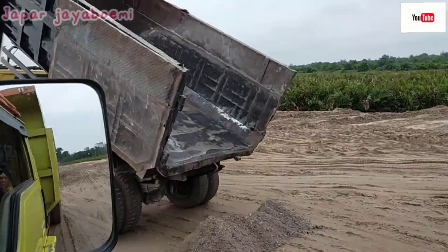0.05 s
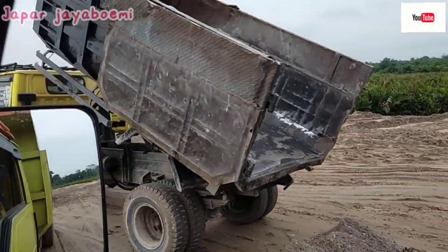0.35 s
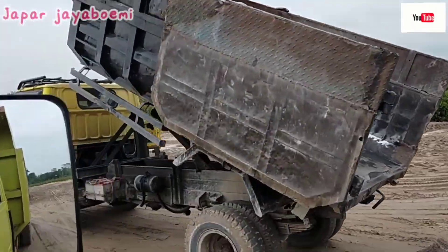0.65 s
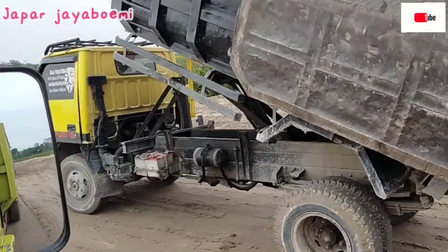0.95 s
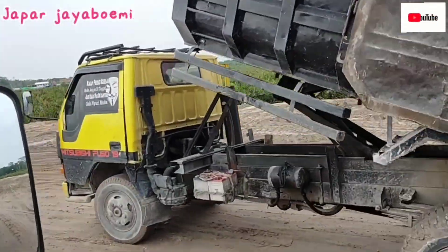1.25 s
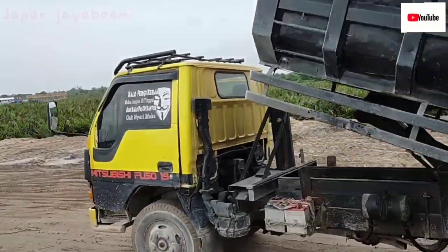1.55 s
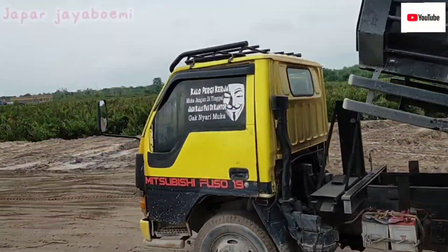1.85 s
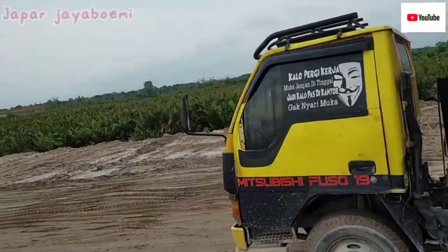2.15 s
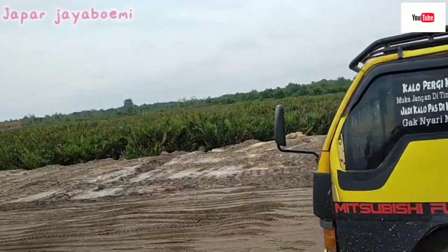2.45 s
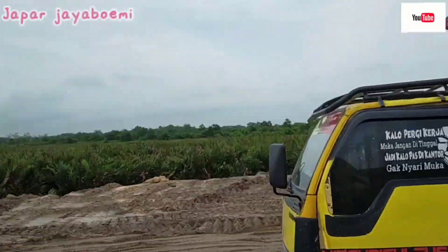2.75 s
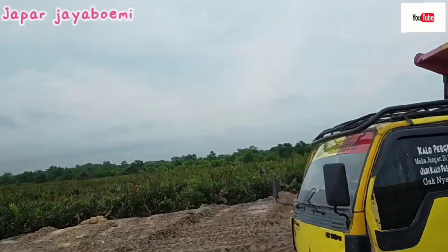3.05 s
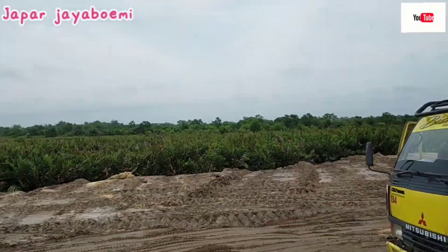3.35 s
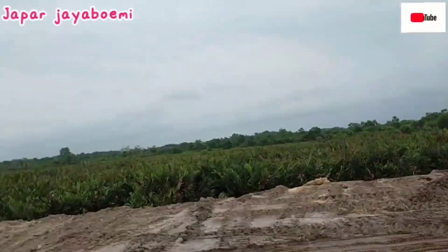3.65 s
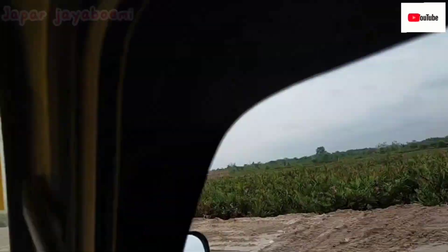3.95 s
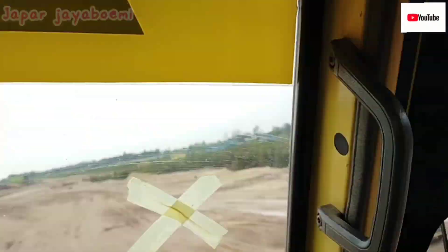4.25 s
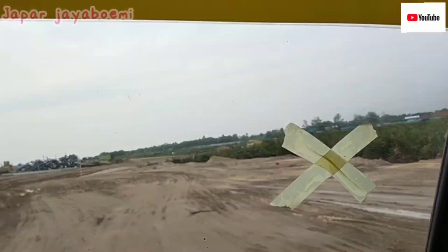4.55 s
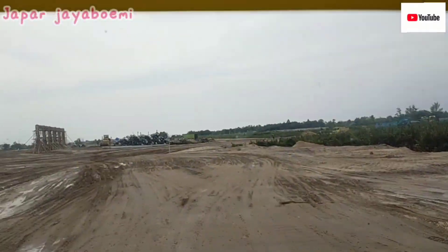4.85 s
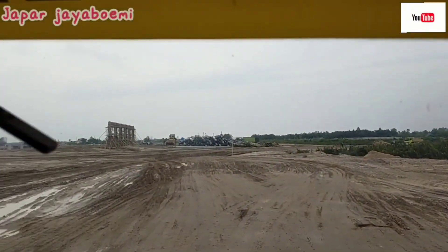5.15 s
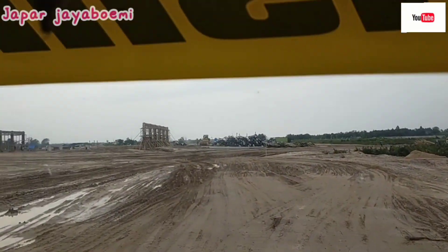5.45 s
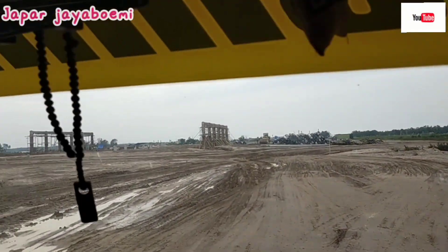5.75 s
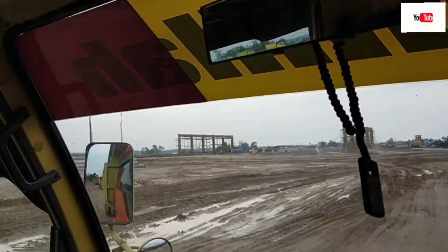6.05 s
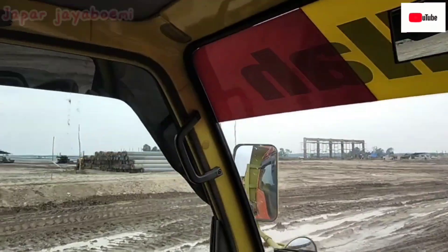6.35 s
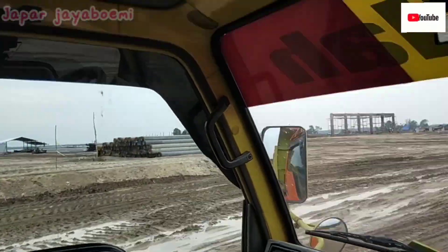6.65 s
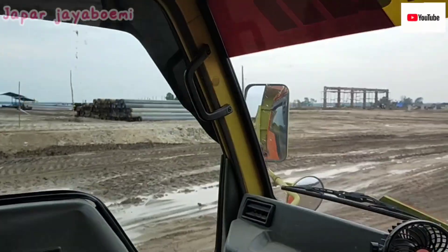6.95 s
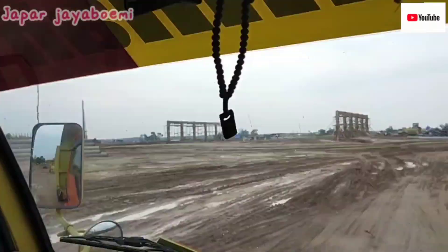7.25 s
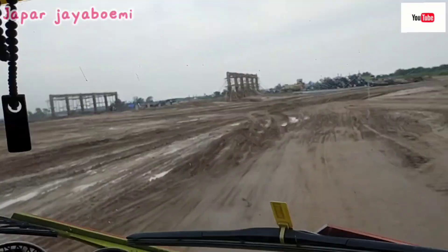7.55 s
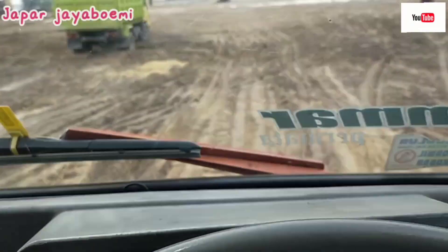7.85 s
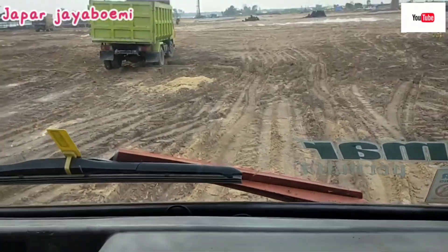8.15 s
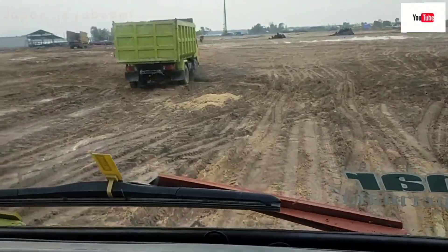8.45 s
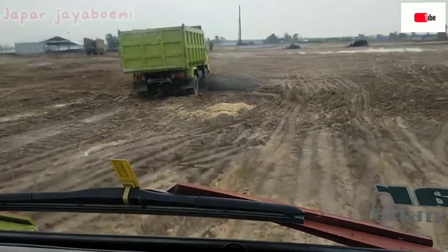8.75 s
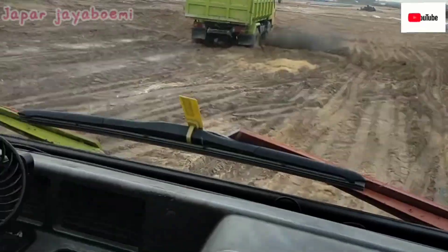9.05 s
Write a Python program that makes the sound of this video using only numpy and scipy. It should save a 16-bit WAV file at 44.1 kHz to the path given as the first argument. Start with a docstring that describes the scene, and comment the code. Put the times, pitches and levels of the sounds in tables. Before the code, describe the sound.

A dump truck's diesel engine clatters steadily at low speed, with occasional metal clinks, as another idling truck slides past the open window. The microphone then sits deeper in the cab, where the exhaust booms, faint whines come and go and the body thuds over rutted ground while the engine rises and dips. Everything cuts off for a moment, then a quieter, uneven chugging resumes under a faint brake squeal.

```python
"""Inside the cab of a four-cylinder diesel dump truck creeping over a dirt site.
At the open window its combustion knock and injector hiss mix with a second truck idling alongside.
Further in, the exhaust booms, panels ring, loose metal clinks and the body thumps over ruts.
After a short silence the truck rolls on near idle, chugging, with a thin squeal from a brake shoe."""
import sys
import numpy as np
from scipy import signal
from scipy.fft import rfft, irfft
from scipy.io import wavfile

SR = 44100
rng = np.random.default_rng(int(sys.argv[2]) if len(sys.argv) > 2 else 0)


def unload_wav(signal):
    """Save mono or channel-first audio to the path in sys.argv[1] as 16-bit WAV at rate SR, clipped to [-1, 1]."""
    wavfile.write(
        sys.argv[1],
        SR,
        np.round(np.clip(np.atleast_2d(signal).T, -1, 1) * 32767).astype(np.int16),
    )


N = 406588
TIME = np.arange(N) / SR
FREQ = np.fft.rfftfreq(N, 1 / SR)
PAUSE_START_S, PAUSE_END_S = 7.570, 8.311
IDLING = TIME > (PAUSE_START_S + PAUSE_END_S) / 2


def amp(db):
    """Decibels to gain."""
    return 10 ** (np.asarray(db) / 20)

def unit(x):
    """Scales to rms 1."""
    return x / np.sqrt(np.mean(x ** 2) + 1e-20)

def noise():
    """White noise."""
    return rng.standard_normal(N)

def tone(cycles):
    """Sine, rms 1."""
    return np.sqrt(2) * np.sin(2 * np.pi * cycles)

def colour(x, spectrum):
    """Filters by (freq_hz, gain_db) points; rms 1."""
    hz, db = np.transpose(spectrum)
    gain_db = np.interp(np.log(FREQ + 1), np.log(hz), db, -90, -90)
    return unit(irfft(rfft(x) * amp(gain_db), N))

def drift(rate_hz, size=8192):
    """Random wander up to about rate_hz; rms 1."""
    hz = np.fft.rfftfreq(size, TIME[-1] / size)
    slow = irfft(rfft(rng.standard_normal(size)) * np.exp(-(hz / rate_hz) ** 2))
    return unit(np.interp(TIME, np.linspace(0, TIME[-1], size), slow))

def narrow_noise(cycles, width_hz):
    """Noise band around a pitch; rms 1."""
    return unit(drift(width_hz) * tone(cycles) + drift(width_hz) * tone(cycles + 1 / 4))

def spells(rows, ramp_s):
    """Sum of trapezoids from (start_s, length_s, height) rows."""
    return sum(height * np.clip(np.minimum(TIME - start, start + length - TIME) / ramp_s + .5, 0, 1)
               for start, length, height in rows)

def placed(inside, window_db, cab_db, idle_db):
    """Level in dB: blends from window to cab, then holds idle_db after the pause."""
    return np.where(IDLING, idle_db, window_db + (cab_db - window_db) * inside)

def impacts(rows, spectrum, rise_s):
    """Each blow is a dying burst of dense ringing."""
    envelope = np.zeros(N)
    for start_s, level_db, decay_s in rows:
        age = np.maximum(TIME - start_s, 0)
        envelope += amp(level_db) * (1 - np.exp(-age / rise_s)) * np.exp(-age / decay_s)
    return envelope * colour(noise(), spectrum)

def firing_pulses(firings, cylinders_db, scatter_db, decay_firings):
    """Envelope of the firings, each cylinder with its own strength; rms 1."""
    count = firings.astype(int)
    scatter = rng.uniform(-scatter_db, scatter_db, 2000)[count]
    strength = amp(np.asarray(cylinders_db)[count % 4] + scatter)
    return unit(strength * np.exp(-(firings % 1) / decay_firings))

def gear_rattle(firings, size=1024):
    """Gears and valves repeat one pattern per crank turn (two firings)."""
    pattern = irfft(np.exp(2j * np.pi * rng.random(size // 2 + 1)))
    return unit(np.interp(firings / 2 * size, np.arange(size), pattern, period=size))


# Body rumble spectrum: freq_hz, gain_db
RUMBLE_SPECTRUM = [(8, -16.5), (20, -7), (35, 4.5), (60, 0), (100, -5), (160, -5), (230, -13.5), (330, -28),
                   (600, -50)]
# Rutted ground: start_s, length_s, boost_db
RUTS = [(5.3, 0.914, 7), (7.1, 0.47, 8.5)]

def rumble(inside):
    """The cab rumbles on its mounts, more over ruts."""
    level_db = placed(inside, window_db=-29.5, cab_db=-31.5, idle_db=-33) + spells(RUTS, ramp_s=.1)
    return amp(level_db) * colour(noise(), RUMBLE_SPECTRUM)


# Tones near idle: pitch_hz, level_db, wander_hz
DRONES = [(34.5, -25.5, 2.653), (55.22, -29.5, 2.23), (99, -30, 2.687), (145.6, -38, 3), (205.6, -40, 2.72),
          (419, -43, 2.02), (1152, -49, 4.1), (2080, -46.5, 4.03)]

def drones():
    """Near idle the cab drones under a faint gear whine."""
    out = np.zeros(N)
    for pitch_hz, level_db, wander_hz in DRONES:
        gain = amp(level_db + 2 * drift(8.26))
        out += gain * tone(np.cumsum(pitch_hz + wander_hz * drift(5.05)) / SR)
    return IDLING * out


# Cab response to a shove: freq_hz, gain_db
CHUG_SPECTRUM = [(20, -20), (40, -5), (65, 3.5), (100, -12),
                 (140, -16), (200, -11.5), (280, -29), (500, -55)]

def chug(rate_hz=17.3):
    """Near idle the engine rocks on its mounts and shoves the cab in uneven beats."""
    beats = np.floor(np.cumsum(rate_hz + 2 * drift(8)) / SR)
    shoves = -np.diff(beats, prepend=0) * amp(2.8 * noise())
    level_db = np.interp(TIME, [8.33, 8.75], [-27, -24])
    return IDLING * amp(level_db) * colour(shoves, CHUG_SPECTRUM)


# Thin whines: start_s, length_s, pitch_hz, glide_hz_per_s, level_db
WHINES = [(4.0, .16, 1462, -6, -37), (4.32, .22, 1497, -2, -39), (6.17, .3, 1465, 195, -42),
          (7.37, .24, 1280, -80, -38)]

def whines():
    """Short gliding tones swell and fade."""
    out = np.zeros(N)
    for start_s, length_s, pitch_hz, glide_hz_per_s, level_db in WHINES:
        age = np.clip(TIME - start_s, 0, length_s)
        swell = np.sin(np.pi * age / length_s)
        out += amp(level_db) * swell * tone((pitch_hz + glide_hz_per_s * age / 2) * age)
    return out


# Brake shoe bites: start_s, length_s, boost_db
BITES = [(8.73, 0.12, 7), (8.95, .27, 6)]

def brake(pitch_hz=6100, sharp_hz=110, settle_s=0.42):
    """Friction keeps a narrow resonance ringing; the pitch settles as the shoe beds in."""
    hz = pitch_hz + sharp_hz * np.exp(-abs(TIME - PAUSE_END_S) / settle_s)
    cycles = np.cumsum(hz) / SR
    rough_note = 1.3 * tone(cycles) + narrow_noise(cycles, width_hz=45)
    squeal = amp(-52.5 + spells(BITES, ramp_s=0.051)) * rough_note
    hiss = amp(-54) * narrow_noise(cycles, width_hz=110)
    octave = amp(-43.5) * narrow_noise(2 * cycles, width_hz=170)
    return IDLING * (squeal + hiss + octave)


# Loose metal hits: start_s, level_db, decay_s
CLINKS = [(.659, -18.6, .011), (1.658, -31, .008), (2.313, -32, .008), (3.435, -34, .006),
          (4.716, -34.5, .022)]
# Clink spectrum: freq_hz, gain_db
CLINK_SPECTRUM = [(700, -25), (1500, -5.5), (2100, 8.5), (3000, 0), (4200, 0.5), (6500, -7.5),
                  (8500, -11.5), (13000, -22.5)]

def clinks():
    """Loose metal strikes and rings briefly."""
    return impacts(CLINKS, CLINK_SPECTRUM, rise_s=0.00043)


# Jolts over ruts: start_s, level_db, decay_s
THUMPS = [(5.69, -30, .1), (5.86, -29, .1), (5.97, -27, .09), (6.11, -28, .08), (6.5, -31, .06),
          (7.11, -28, .04), (7.165, -15, .025), (7.221, -17, .022), (7.3, -24, .05), (7.405, -24, .05)]
# Thump spectrum: freq_hz, gain_db
THUMP_SPECTRUM = [(50, -19), (100, -1), (175, -3.5), (270, -4), (400, -9.5), (600, -19), (1200, -37)]

def thumps():
    """Ruts jolt the body into dull thuds."""
    return impacts(THUMPS, THUMP_SPECTRUM, rise_s=0.0016)


def passing(closest_s, half_s):
    """Nearness, 0-1, of something sliding past the window."""
    return 1 / np.sqrt(1 + ((TIME - closest_s) / half_s) ** 4)

def neighbour(firings, near, inside, hum_hz=560):
    """The idling truck booms through the window, its bass carrying far; a hum swells as its cab passes."""
    boom = amp(-28.5) * np.sqrt(near) * (1 - inside) * (tone(firings) + amp(-9) * tone(2 * firings))
    hum = amp(-37.5) * passing(closest_s=3.25, half_s=.55) * narrow_noise(hum_hz * TIME, width_hz=39)
    return boom + hum


# Cab panel modes: pitch_hz, width_hz, window_db, cab_db, idle_db
PANEL_MODES = [(297.5, 25, -54, -41.5, -54), (325.8, 18, -36.5, -42.5, -52), (621, 41, -44, -44, -58),
               (1300, 80, -52, -49, -58), (1509.3, 80, -51, -44, -56)]

def panels(firings, load_db, inside):
    """Engine rattle drives narrow sheet-metal resonances, louder under load."""
    drive = rfft(1.4 * gear_rattle(firings) + noise())
    out = np.zeros(N)
    for pitch_hz, width_hz, *levels_db in PANEL_MODES:
        ring = irfft(drive / (1 + 1j * (FREQ - pitch_hz) / width_hz) ** 2, N)
        out += amp(placed(inside, *levels_db)) * unit(ring)
    return amp(0.6 * load_db) * out


# Injector and valve hiss spectrum: freq_hz, gain_db
HISS_SPECTRUM = [(3000, -24), (4300, -11.5), (5000, -13.5), (6200, -12.5), (7000, -9), (7750, -5.5),
                 (8400, -10), (9100, -15.5), (10500, -15), (12000, -11), (13200, -6), (14500, 0),
                 (15200, -3), (16000, -3)]

def injector_hiss(firings, neighbour_firings, load_db, near, inside):
    """Injectors and valves hiss in time with each engine; the neighbour's share fades inside the cab."""
    own = noise() * (1.4 + firing_pulses(firings, [1.5, -1, -1, 0], scatter_db=1.5, decay_firings=.6))
    other = noise()
    other *= .9 + firing_pulses(neighbour_firings, [1, -1, 0, 0], scatter_db=1.5, decay_firings=.55)
    both = own * np.sqrt(1 + inside) + amp(4.5) * other * np.sqrt(1 - inside)
    level_db = placed(inside, window_db=-36, cab_db=-38, idle_db=-35) + 0.9 * load_db + 4 * near
    return amp(level_db) * colour(both, HISS_SPECTRUM)


# Modes of the struck block: pitch_hz, t60_s, level_db
RING_MODES = [(1211, 0.072, 0), (1271, 0.1, -3.5), (1521, 0.067, -11), (2250, 0.019, -15)]

def hard_knock(firings, load_db, reflection_db, inside, cylinders_db=(0, -12, -5, -11), accent_s=2.73):
    """Every firing strikes the block, one cylinder hardest, so the ring pulses once per engine cycle."""
    count = np.floor(firings - np.interp(accent_s, TIME, firings)).astype(int)
    onsets = np.diff(count, prepend=count[0]) > 0
    strikes = onsets * amp(np.asarray(cylinders_db)[count % 4] + rng.uniform(-4.9, 3.5, N))
    age = TIME[:SR // 10]
    ring = sum(amp(db - 60 * age / t60_s) * np.sin(2 * np.pi * (hz * age + rng.random()))
               for hz, t60_s, db in RING_MODES)
    ring *= 1 - np.exp(-age / 0.0035)  # builds as it spreads through the casting
    level_db = placed(inside, window_db=-35.5, cab_db=-42, idle_db=-52) + reflection_db
    level_db += 2.2 * np.minimum(load_db, 0.5)
    return amp(level_db) * unit(signal.oaconvolve(strikes, ring)[:N])


# Broad block and panel resonances: pitch_hz, width_hz, gain_db
BLOCK_MODES = [(326.5, 22, -9.5), (622, 37, -6.5), (1210, 140, -11), (1460, 56, -9), (2126, 120, -8.5),
               (2492, 160, -4.5)]
# Knock spectrum at the window: freq_hz, gain_db
KNOCK_WINDOW = [(150, -19.5), (230, -15.5), (290, -6.5), (400, -2), (450, -2), (530, -1), (790, -4.5),
                (960, -2), (1050, -4.5), (1400, -2.5), (1800, -5.5), (2480, -9.5), (3660, -18),
                (5800, -26.5), (7000, -39)]
# Knock spectrum in the cab: freq_hz, gain_db
KNOCK_CAB = [(150, -3.5), (230, -1.5), (300, -6), (370, -8), (480, -6), (550, -4), (700, -6), (890, -6),
             (1250, -6), (1500, -7), (1950, -9.5), (2500, -14.5), (3370, -18), (5800, -30.5), (7000, -44)]
# Knock spectrum near idle: freq_hz, gain_db
KNOCK_IDLE = [(150, -22), (230, -9), (300, -7.5), (360, -17), (480, -12), (600, -7.5), (800, -5.5),
              (1170, -10), (1340, -10.5), (2060, -12.5), (3050, -17), (3500, -16.5), (4600, -23.5),
              (5400, -19), (6000, -17.5), (7200, -25)]

def knock(firings, load_db, reflection_db, inside):
    """Combustion knock and gear rattle ring the block, heard through the window or the cab."""
    drive = 0.36 * gear_rattle(firings) + noise()
    drive *= 1.25 + firing_pulses(firings, [0, -1, 0, -1.5], scatter_db=3.75, decay_firings=1)
    response = 1 + sum(amp(db) / (1 + 2j * (FREQ - hz) / width_hz) for hz, width_hz, db in BLOCK_MODES)
    clatter = irfft(rfft(drive) * response, N)
    via_window = np.sqrt(1 - inside) * colour(clatter, KNOCK_WINDOW)
    via_cab = np.sqrt(inside) * colour(clatter, KNOCK_CAB)
    level_db = placed(inside, window_db=-28.8, cab_db=-32.3, idle_db=-30.5) + load_db + reflection_db
    return amp(level_db) * np.where(IDLING, colour(clatter, KNOCK_IDLE), via_window + via_cab)


# Exhaust and crank overtones: firing_multiple, level_db
ORDERS = [(.5, -14), (1.5, -11), (2, -5), (2.5, -14.5), (3, -2), (3.5, -24.5), (4, -2), (4.5, -29),
          (5, -16.5), (5.5, -22), (6, -18.5), (7, -20.5), (8, -18.5), (13, -12)]
# Cab air response: freq_hz, gain_db
CAB_RESPONSE = [(25, 11.5), (80, -1.5), (100, -1.5), (109, 5.5), (120, -11.5), (150, -3.5), (162, -3.5),
                (173, -0.5), (184, -6), (198, 3), (211, -1.5), (228, -8.5), (270, 0.5), (315, 5),
                (380, -5.5), (500, -5), (630, -14), (800, -13.5)]

def overtones(firings, firing_hz, load_db, inside):
    """Wavering engine orders swell as they glide through the resonances of the cab air."""
    out = np.zeros(N)
    for multiple, order_db in ORDERS:
        cab_gain_db = inside * np.interp(multiple * firing_hz, *np.transpose(CAB_RESPONSE))
        out += amp(order_db + cab_gain_db + 1.67 * drift(6.4)) * tone(multiple * firings + rng.random())
    return amp(placed(inside, window_db=-28.5, cab_db=-31, idle_db=-35) + 0.93 * load_db) * out


# Brief dips in the boom: start_s, length_s, gain_db
BOOM_DIPS = [(.36, .12, -5), (1.3, .08, -4), (1.58, 0.071, -6), (2.69, 0.2, -5), (7.12, .25, -2.5),
             (8.28, .19, -5)]

def exhaust_boom(firings, load_db, near, inside):
    """Exhaust pulses boom at the firing rate; the level wavers most near idle."""
    level_db = placed(inside, window_db=-15.5, cab_db=-12.5, idle_db=-22) - 0.12 * load_db - 2 * near
    level_db += spells(BOOM_DIPS, ramp_s=.04)
    waver_db = (0.7 + 0.79 * (1 - inside) + 2.01 * IDLING) * drift(13)
    return amp(level_db + waver_db) * tone(firings)


# Engine speed before the pause: time_s, firing_hz
ENGINE_SPEED = [(0, 47.76), (0.3, 49.8), (0.48, 46.64), (0.7, 49.3), (1, 47.36), (2.45, 46.63),
                (2.67, 50.0), (2.9, 46.8), (3.15, 52.72), (3.41, 45.9), (3.68, 51.48), (4.06, 49.24),
                (4.26, 52.93), (5.32, 56.4), (5.47, 53.54), (5.67, 56.74), (6.22, 55.3), (6.53, 60.0),
                (6.8, 48), (7.2, 60.8), (7.38, 54.8), (7.55, 52.9)]
# Pedal pressed or eased: start_s, length_s, load_db
PEDAL = [(2.55, 0.6898, 1.1), (3.35, .5, -0.4), (4.15, .4, 0), (5.12, .27, 1.8), (5.6, 0.306, 1.7),
         (6.0, 0.46, -1), (6.47, 0.078, 4), (6.6, 0.22, -5.5), (6.88, .18, -4), (7.12, 0.19, 1.5)]
# Sound arriving through the cab rather than the window: time_s, share (clipped to 0-1)
CAB_SHARE = [(0, 0.06), (3.2, 0.1), (4.06, 0.37), (4.18, 0.85), (4.9, 1.05), (7.5, 1.03)]

def scene(idle_hz=49.15, neighbour_hz=40.4):
    """Both trucks in mono, driven by engine speed, load, nearness and the listener's place."""
    firing_hz = np.where(IDLING, idle_hz, np.interp(TIME, *np.transpose(ENGINE_SPEED))) + .15 * drift(5)
    firings, neighbour_firings = np.cumsum(firing_hz) / SR, neighbour_hz * TIME
    load_db = spells(PEDAL, ramp_s=0.024)
    inside = np.clip(np.interp(TIME, *np.transpose(CAB_SHARE)), 0, 1)
    near = passing(closest_s=2.05, half_s=0.56)
    reflection_db = 2.5 * near  # the neighbour's flank throws the knock back
    mix = exhaust_boom(firings, load_db, near, inside) + overtones(firings, firing_hz, load_db, inside)
    mix += knock(firings, load_db, reflection_db, inside)
    mix += hard_knock(firings, load_db, reflection_db, inside)
    mix += rumble(inside) + drones() + chug()
    mix += panels(firings, load_db, inside) + whines() + thumps() + clinks()
    mix += neighbour(neighbour_firings, near, inside)
    mix += injector_hiss(firings, neighbour_firings, load_db, near, inside)
    return (mix + brake())[None]

def record(dry, fade_s=0.014, cutoff_hz=15850):
    """The sound stops dead for the pause and fades quickly back in; a low-pass trims the top."""
    fade_in = np.sqrt(np.clip((TIME - PAUSE_END_S) / fade_s, 0, 1))
    gate = np.where(IDLING, fade_in, TIME < PAUSE_START_S)
    lowpass = signal.firwin(511, cutoff_hz, window=("kaiser", 9), fs=SR)
    return signal.oaconvolve(dry * gate, lowpass[None], "same")


dry = scene()
out = record(dry)
unload_wav(out)
```